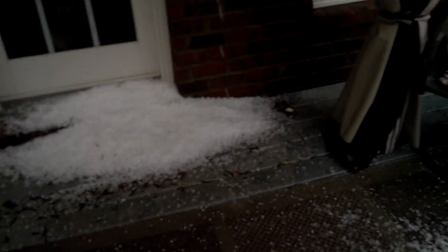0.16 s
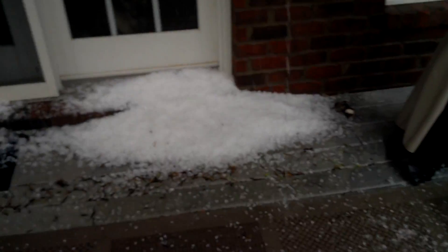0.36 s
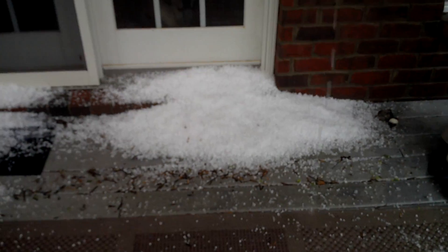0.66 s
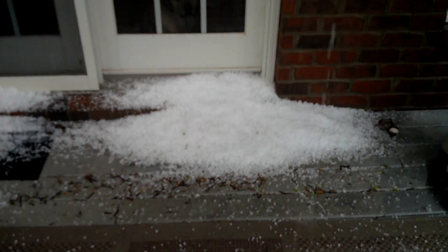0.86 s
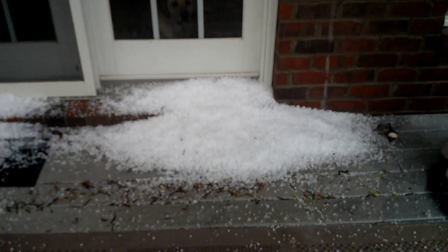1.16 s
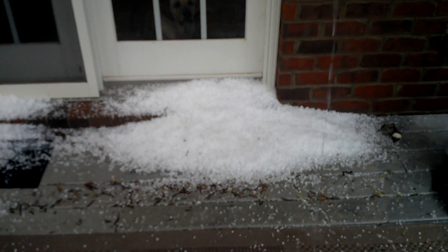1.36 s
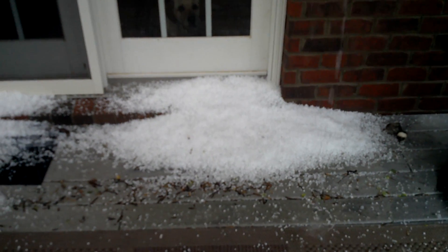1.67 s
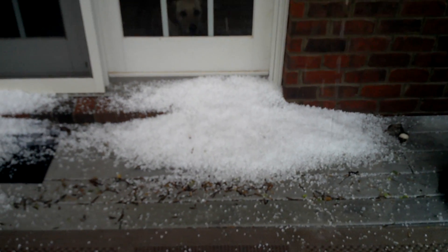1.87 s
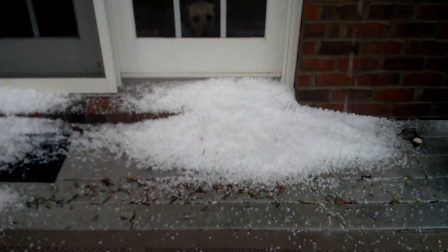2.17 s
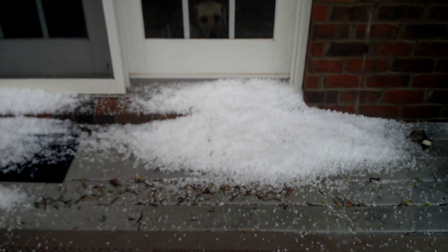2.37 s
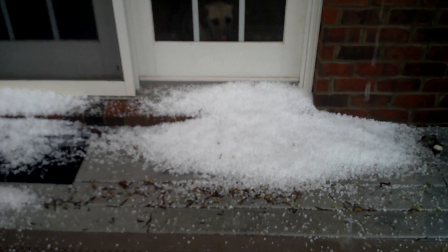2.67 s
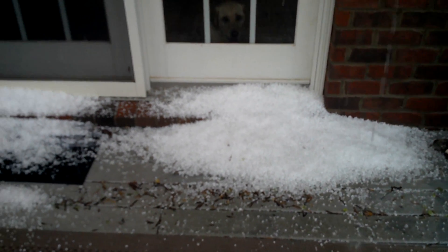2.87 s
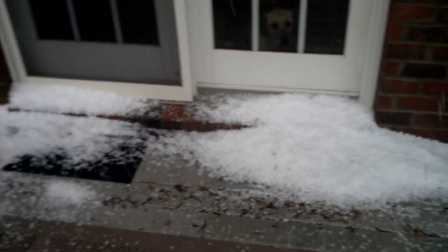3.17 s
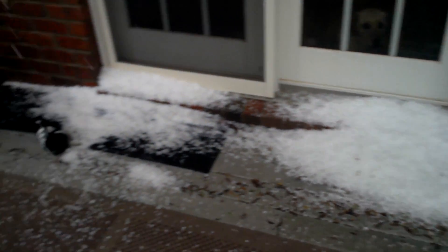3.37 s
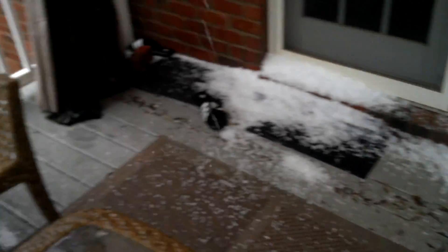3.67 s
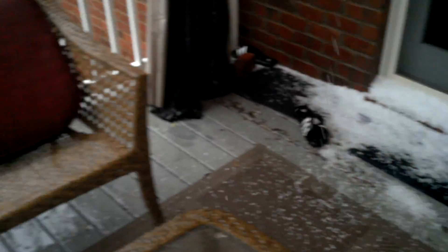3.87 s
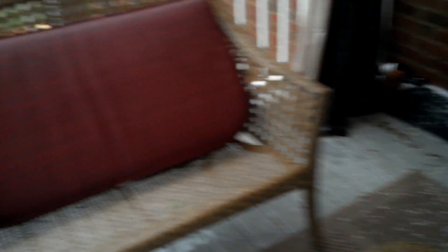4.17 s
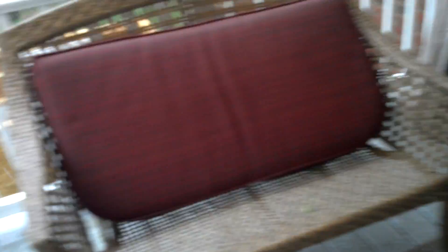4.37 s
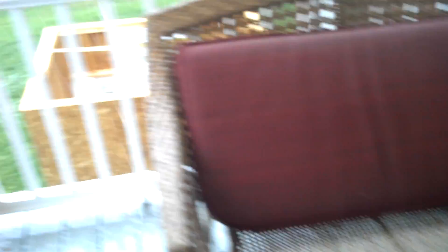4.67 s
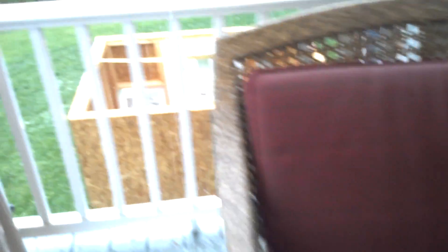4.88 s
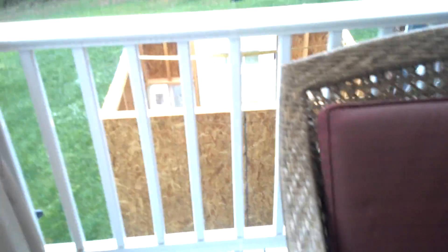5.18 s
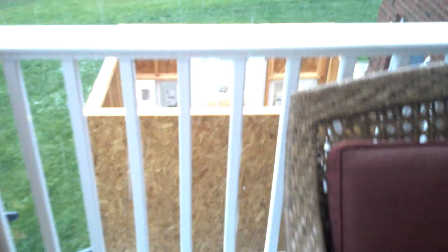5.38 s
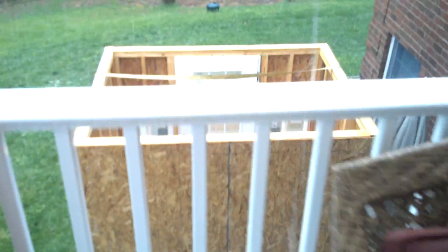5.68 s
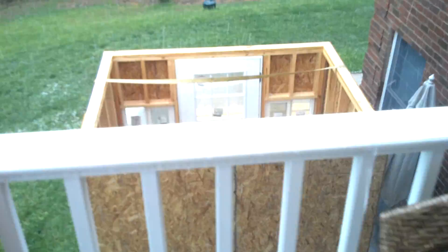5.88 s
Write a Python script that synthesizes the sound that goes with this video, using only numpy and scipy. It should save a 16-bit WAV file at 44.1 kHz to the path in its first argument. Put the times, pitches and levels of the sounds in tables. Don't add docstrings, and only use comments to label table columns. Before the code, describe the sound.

Dense hailstorm heard from a porch: roof thuds, crisp ticking patter, irregular hard cracks of large stones, then low gusts buffeting the microphone.

```python
import sys
import numpy as np
from scipy import signal
from scipy.fft import rfft, irfft
from scipy.io import wavfile
from scipy.ndimage import uniform_filter1d

SR = 44100
rng = np.random.default_rng(int(sys.argv[2]) if len(sys.argv) > 2 else 0)


def materialize(psi):
    bounded = np.clip(np.atleast_2d(psi).T, -1, 1)
    quanta = np.round(bounded * 32767).astype(np.int16)
    wavfile.write(sys.argv[1], SR, quanta)


def nominal_scale(level):
    x = np.asarray(level, float) / 20
    return 10 ** x


N = 265482

SCATTER_DB = -22


def rms_one(x):
    return x / np.sqrt(np.mean(x ** 2) + 1e-20)


def over_time(rows):
    start_s, value = np.transpose(rows)
    return np.interp(np.arange(N) / SR, start_s, value)


def coloured(x, points):
    table_hz, level_db = np.transpose(points)
    log_hz = np.log(np.fft.rfftfreq(N, 1 / SR) + 1)
    return irfft(rfft(x) * nominal_scale(np.interp(log_hz, np.log(table_hz), level_db)), N)


def drift(rate):
    r = np.exp(-80 * np.pi * rate / SR)
    slow = signal.lfilter([1], [1, -2 * r, r * r], rng.standard_normal(N // 40 + 2002))[2000:]
    return np.interp(np.arange(N) / 40, np.arange(len(slow)), rms_one(slow))


def ring(clicks, hz, t60):
    r = nominal_scale(-60 / (t60 * SR))
    w = 2 * np.pi * hz / SR
    return signal.lfilter([0, np.sin(w)], [1, -2 * r * np.cos(w), r * r], clicks + 1e-18)


def impacts(per_s, spread_db, clump_db):
    sizes = nominal_scale(spread_db * np.minimum(rng.exponential(1, N), 5)) * rng.choice([-1, 1], N)
    landed = rng.random(N) < per_s * nominal_scale(clump_db * drift(9)) / SR
    return rms_one(sizes * landed)


def porch(x, t60):
    r = nominal_scale(-120 / (t60 * SR))
    delayed = np.roll(x, int(0.001 * SR))
    energy = signal.lfilter([1 - r], [1, -r], delayed ** 2)
    return np.sqrt(energy) * rng.standard_normal(N)


def wind():
    # start_s (moment of the peak), level_db (at the peak)
    gusts = [(3.72, -52), (3.85, -57), (4.06, -52), (4.22, -55), (4.36, -42.5), (4.58, -44.5), (4.73, -47),
             (4.83, -43.5), (4.92, -42.5), (5.03, -39), (5.18, -35.5), (5.28, -40), (5.35, -45),
             (5.55, -48), (5.69, -42), (5.75, -43), (5.84, -42), (5.95, -45.5)]
    # pitch_hz, level_db
    wind_colour = [(20, -30), (50, 0), (100, 14), (150, 18), (250, 4), (500, -51)]
    rise_db_per_s, fall_db_per_s, calm_db = 300, 163, -66
    t = np.arange(N) / SR
    gust_db = np.full(N, float(calm_db))
    for start_s, level_db in gusts:
        puff = np.minimum(rise_db_per_s * (t - start_s), fall_db_per_s * (start_s - t))
        gust_db = np.maximum(gust_db, level_db + puff)
    lumpy = rng.standard_normal(N) * nominal_scale(1.4 * drift(26.0))
    return nominal_scale(gust_db + 15.0) * rms_one(coloured(lumpy, wind_colour))


def roof(roar_db):
    # pitch_hz, level_db
    roar_colour = [(40, -82), (100, -6.5), (200, -2), (300, 1), (450, -2.5), (700, -6.5), (1000, -18),
                   (1500, -28), (2500, -23.5), (5000, -57)]
    # start_s, level_db (at the peak), pitch_hz
    thuds = [(0.026, -16, 380), (0.045, -4.5, 383), (0.0735, -9, 563), (0.747, -13, 368),
             (1.021, -10.5, 596), (1.365, -8, 395), (1.444, -10, 570), (1.525, -7, 377), (1.655, -9, 620),
             (1.717, -8.5, 660), (2.244, -9.5, 676), (2.286, -9, 414), (2.541, -10, 740),
             (2.655, -6.5, 650), (2.979, -11, 624), (3.363, -10, 444), (4.1, -18, 501), (4.976, -8.5, 420),
             (5.076, -10, 587), (5.677, -9, 670), (5.781, -9, 393), (5.847, -21, 566), (5.889, -9, 450),
             (5.967, -14, 430), (5.979, -3.5, 643)]
    hits = impacts(per_s=900, spread_db=3.5, clump_db=1.0)
    smeared = hits + 1.62 * porch(hits, t60=0.51)
    roar = nominal_scale(roar_db) * rms_one(coloured(smeared, roar_colour))
    for start_s, level_db, hz in thuds:
        at = int((start_s + 0.00108) * SR)
        t = np.arange(min(2000, N - at)) / SR
        tone = np.sin(2 * np.pi * hz * t) + 0.27 * np.sin(2 * np.pi * hz * 2.78 * t)
        onset = 1 - np.exp(-t / 0.00018)
        dying = nominal_scale(level_db - 8.5 - 60 * t * hz / 8.9)
        roar[at:at + len(t)] += dying * tone * onset
    return signal.sosfilt(signal.butter(2, 110, "high", fs=SR, output="sos"), roar)


def ice_ticks():
    hits = impacts(per_s=2500, spread_db=2.5, clump_db=2.5)
    pitch_of_hit = rng.integers(0, 12, N)
    total = np.zeros(N)
    for k, hz in enumerate(np.geomspace(900, 14000, 12)):
        total += (hz / 1000) ** 0.63 * ring(hits * (pitch_of_hit == k), hz, 6.8 / hz)
    return rms_one(total)


def patter(tick_db):
    # pitch_hz, level_db
    front_colour = [(40, -36), (70, -42), (110, -0.5), (200, 8), (500, 10), (1000, 6), (2000, 1.5),
                    (3500, -1), (6000, -2), (9000, -3.5), (12000, -7.5), (15500, -11.5), (20000, -40)]
    # pitch_hz, level_db
    back_colour = [(60, -6), (200, -26), (500, -22), (1000, -9), (2000, -1), (3500, -6.5), (8000, -3),
                   (12000, -17), (20000, -9)]
    ticks = ice_ticks()
    front = 0.61 * ticks + 0.5 * porch(ticks, t60=0.32) + 0.57 * rng.standard_normal(N)
    back = 0.58 * porch(ticks, t60=0.39) + 0.68 * rng.standard_normal(N)
    front = coloured(front, front_colour)
    back = coloured(coloured(back, front_colour), back_colour)
    scale = nominal_scale(tick_db + 6 + 0.43 * drift(4.6)) / np.std(front)
    return scale * front, scale * back


def rail_ping():
    # pitch_hz, level_db, t60_s
    rail_tones = [(9180, -28, .1), (9245, -26, .16), (9370, -28, .08), (9480, -29, .06), (10480, -33, .05)]
    start_s = 2.515
    clicks = np.zeros(N)
    clicks[int(start_s * SR)] = 0.6
    clicks[int((start_s + 0.006) * SR)] = 0.9
    return sum(nominal_scale(level_db) * ring(clicks, hz, t60) for hz, level_db, t60 in rail_tones)


def landings():
    # start_s, level_db (at the peak),
    # pitch_hz (colour), scatter_db
    cracks = [(0.0974, -3.5, 5040, -28.5), (0.1011, -12, 8900, -24), (0.3316, -15, 7800, -26),
              (0.71, -33, 6170, -31), (0.9212, -31, 4300, -18), (1.4698, -14, 3900, -25),
              (1.6808, -15, 7600, -24), (1.8005, -31, 4700, -15), (1.9274, -19, 6740, -19),
              (2.0369, -13.5, 5900, -24), (2.5008, -11, 5000, -24), (2.6599, -8, 5600, -24.5),
              (2.6733, -13, 7700, -33), (2.786, -16, 5000, -33), (3.0468, -7.5, 9200, -29),
              (3.1626, -16.5, 8000, -30), (3.3063, -17, 5800, -21), (3.5606, -21, 7800, -16),
              (3.6204, -18, 4100, -19), (3.6387, -10.5, 5030, -32), (3.6518, -12, 4100, -20),
              (3.7223, -7, 4300, -21.5), (3.8594, -13.5, 4400, -20), (4.3077, -14, 9500, -25),
              (4.5464, -7.5, 5150, -28), (4.6488, -19, 7000, -28), (5.4717, -49, 5900, -25),
              (5.505, -18, 6300, -16), (5.5628, -11, 6400, -24), (5.722, -10.5, 8600, -33)]
    bounce_s, bounce_db = 0.0042, -8
    bounces = [(s + bounce_s, db + bounce_db, hz, SCATTER_DB) for s, db, hz, _ in cracks]
    count, low_hz, high_hz = 60, 3300, 10500
    small = []
    for k, (when, size, colour) in enumerate(rng.random((count, 3))):
        start_s = (k + when) * N / SR / count + 0.001
        level_db = -19 + 3 * (2 * size - 1)
        small.append((start_s, level_db, low_hz * (high_hz / low_hz) ** colour, SCATTER_DB))
    return list(cracks) + bounces + small


def near_stones():
    # start_s, level_db (at the peak), pitch_hz (colour), scatter_db
    sprays = [
        (2.130, -22, 9500, -17),
        (2.339, -18, 10500, -17),
        (2.475, -19, 4000, -27),
        (4.291, -19, 4200, -22),
        (4.762, -20, 8500, -14),
    ]
    out = np.zeros(N + 6000)
    t = np.arange(6000) / SR
    dying = (nominal_scale(-60 * t / 0.025) + 0.6 * nominal_scale(-60 * t / 0.19)) * (t > 0.003)
    for start_s, level_db, hz, scatter_db in list(sprays) + landings():
        tail = rng.standard_normal(len(t)) * dying
        hit = nominal_scale(scatter_db + 8.5) * signal.lfilter([0.6], [1, -0.4], tail)
        hit[0] += 1.0
        hit[int(0.0036 * SR)] -= 0.2
        spread = 2 ** np.clip(0.85 + 0.03 * (level_db + 5), 0.25, 1)
        edges_hz = [hz * 1.08 / spread, min(hz * 1.1 * spread, 13500)]
        band = signal.butter(2, edges_hz, "band", fs=SR, output="sos")
        at = int(start_s * SR) - 3
        out[at:at + len(t)] += nominal_scale(level_db + 9) * signal.sosfilt(band, hit)
    return out[:N]


def scene():
    # start_s, level_db
    storm = [(0.0, -28), (0.28, -32.5), (0.91, -30.5), (1.22, -31.5), (1.49, -29.5), (1.91, -30.5),
             (2.18, -28.5), (2.41, -30), (3.59, -32), (4.09, -31), (5.1, -29.5), (5.43, -29), (5.73, -31.5),
             (6.02, -28.5)]
    # start_s, level_db (gain of the ticks)
    facing = [
        (0.0, -2),
        (1.9, 0),
        (3.6, 0.83),
        (3.75, -1),
        (4.48, -0.3),
        (6.02, 0.16),
    ]
    roar_db = over_time(storm)
    tick_db = -36 + 0.84 * (roar_db - roar_db.mean()) + over_time(facing)
    roar = roof(roar_db)
    front, back = patter(tick_db)
    lead_s = 2e-5
    sooner = np.interp(np.arange(N) + lead_s * SR, np.arange(N), roar)
    return np.array([wind() + roar + front + rail_ping() + near_stones(), sooner + back])


def ducked(x):
    knee_db, share, recover_db_per_s, attack_s = -10, 0.4, 14, 0.0076
    ramp = recover_db_per_s * np.arange(N) / SR
    peak_db = 20 * np.log10(np.abs(x).max(0) + 1e-9)
    over = share * np.maximum(peak_db - knee_db, 0)
    held = np.maximum.accumulate(over + ramp) - ramp
    r = np.exp(-1 / (attack_s * SR))
    return x * nominal_scale(-signal.lfilter([1 - r], [1, -r], held))


def masked(x):
    # pitch_hz, level_db (against the partner)
    masking = [(900, -19), (1400, -14), (3000, -10), (6000, -10.5), (9000, -10.5), (11000, -6.5),
               (14000, -5), (16000, -6)]
    # above_hz, share (of frames)
    top_drops = [(15000, .12), (15720, .9)]
    size, lead = 8, 214
    x = np.pad(x, ((0, 0), (lead, 0)))
    hz, _, z = signal.stft([x[0] + x[1], x[0] - x[1]], SR, "cosine", 2048, 1024)
    frames = z.shape[2]
    hz = hz[:, None]
    low_hz = hz[:1024]
    power = np.abs(z[:, :1024]) ** 2
    power = np.repeat(power.reshape(2, -1, size, frames).mean(2), size, axis=1)
    table_hz, table_db = np.transpose(masking)
    limit = nominal_scale(2 * np.interp(np.log(low_hz + 1), np.log(table_hz), table_db))
    flutter = np.repeat(rng.standard_normal((1024 // (2 * size), frames)), 2 * size, axis=0)
    limit = limit * nominal_scale(-1.5 + 0.5 * low_hz / 1000 * flutter)
    bright = power[:, 140:].sum((0, 1))
    sharp = bright > 1.9 * uniform_filter1d(bright, size=21)
    z[:, :1024] *= (power > limit * power[::-1]) | sharp | (low_hz < 900)
    for above_hz, share in top_drops:
        z *= (hz < above_hz) | (rng.random(frames) > share) | sharp
    mid, side = signal.istft(z, SR, "cosine", 2048, 1024)[1][:, lead:lead + N] / 2
    return np.array([mid + side, mid - side])


def low_pass(x):
    return signal.sosfilt(signal.butter(12, 16000, fs=SR, output="sos"), x)


def record(dry):
    delay, right_db = 16, 2.5
    late = np.pad(dry, ((0, 0), (delay, 0)))[::-1, :N]
    wide = (dry - late) * nominal_scale([[0], [right_db]])
    wide = signal.sosfilt(signal.cheby2(12, 45, 16250, fs=SR, output="sos"), wide)
    mix = masked(ducked(wide))
    return low_pass(mix)


dry = scene()
out = record(dry)
materialize(out)
```